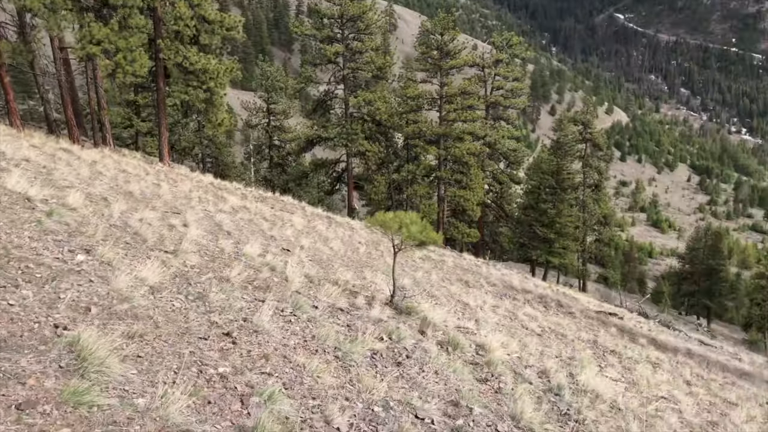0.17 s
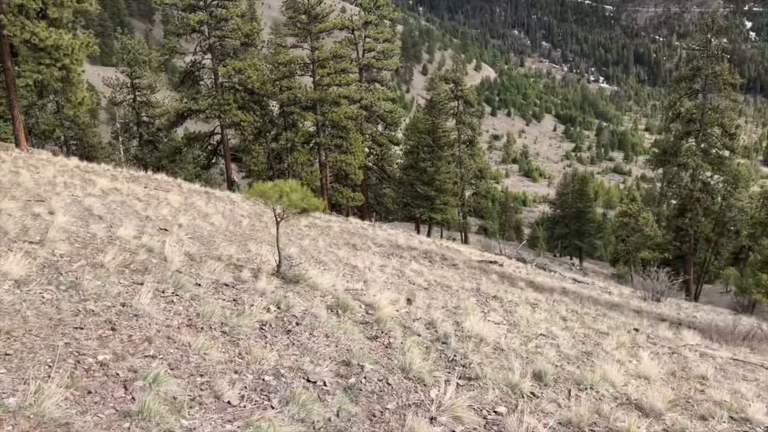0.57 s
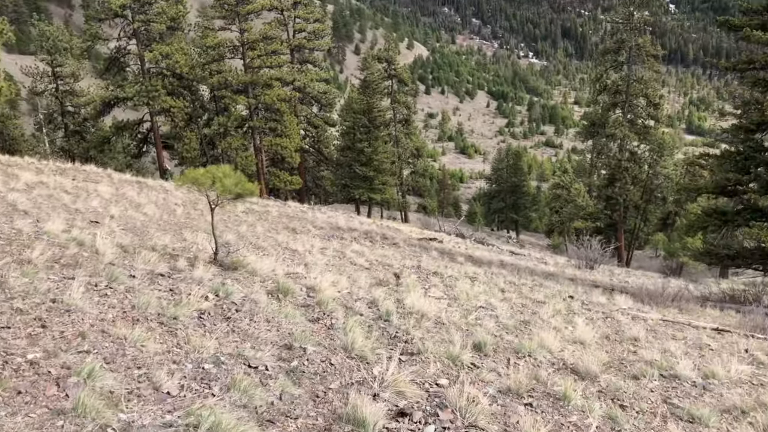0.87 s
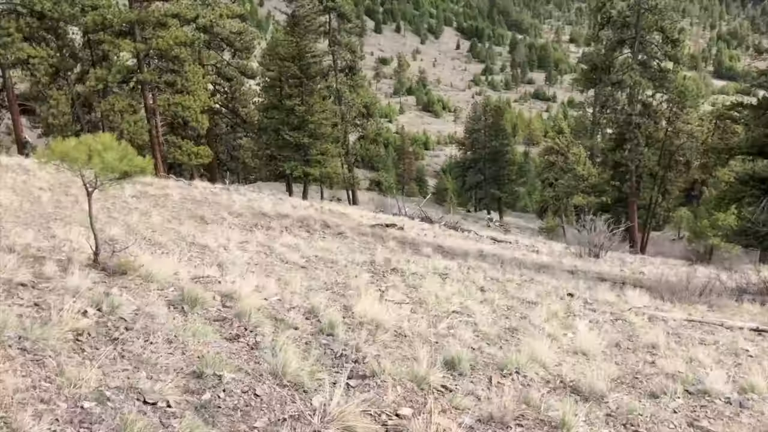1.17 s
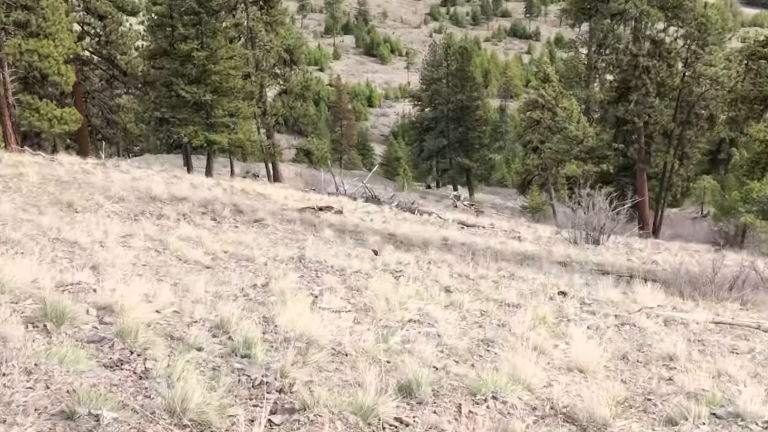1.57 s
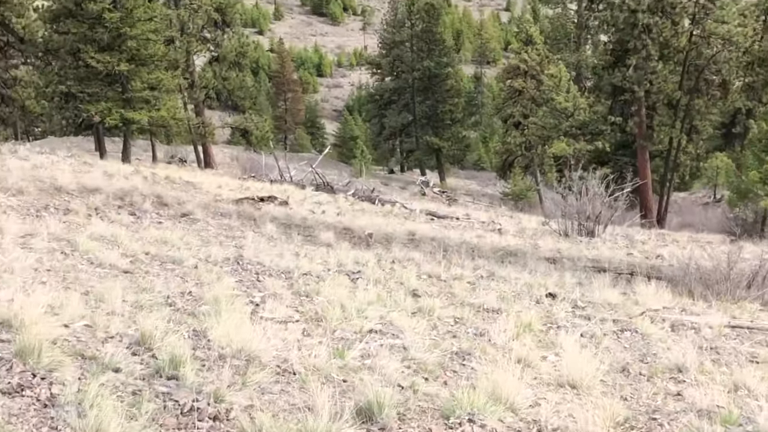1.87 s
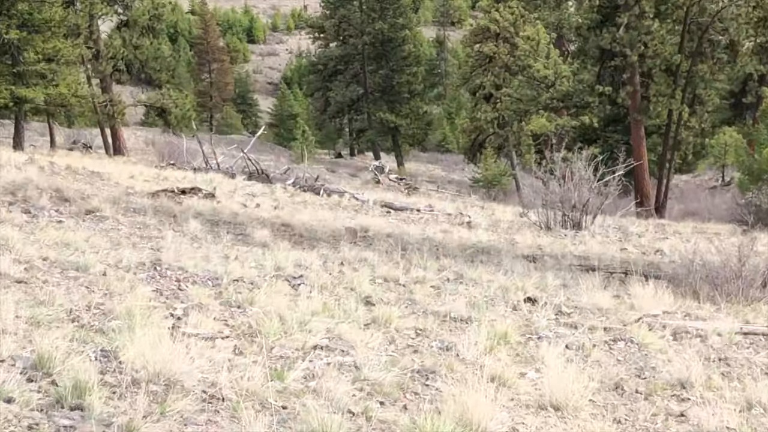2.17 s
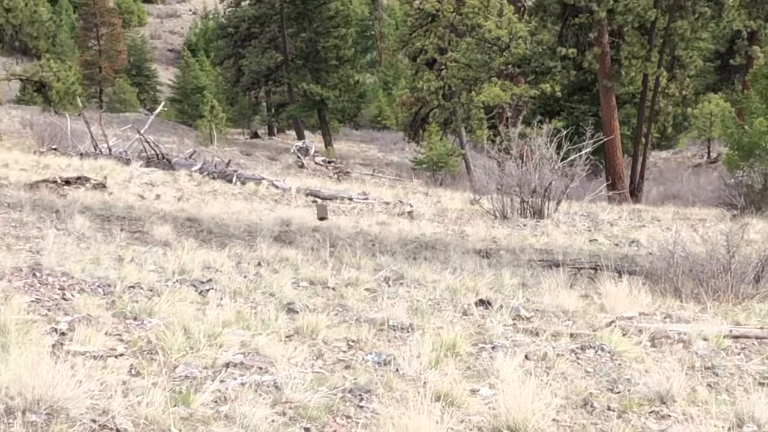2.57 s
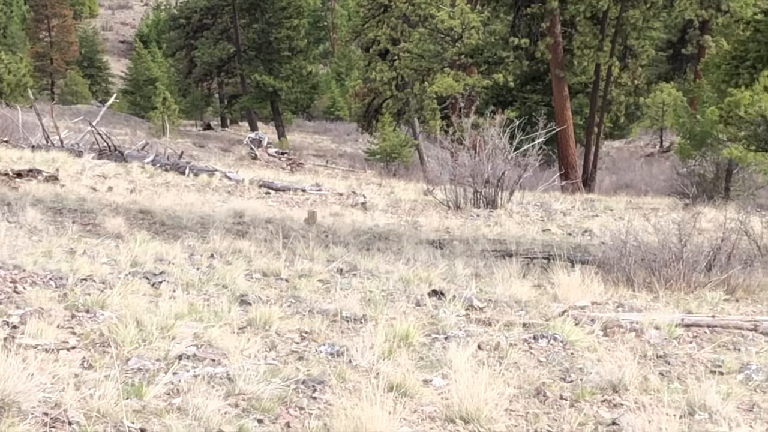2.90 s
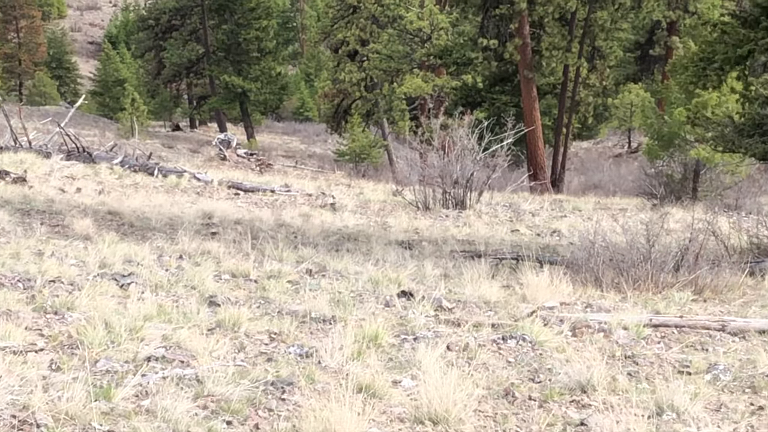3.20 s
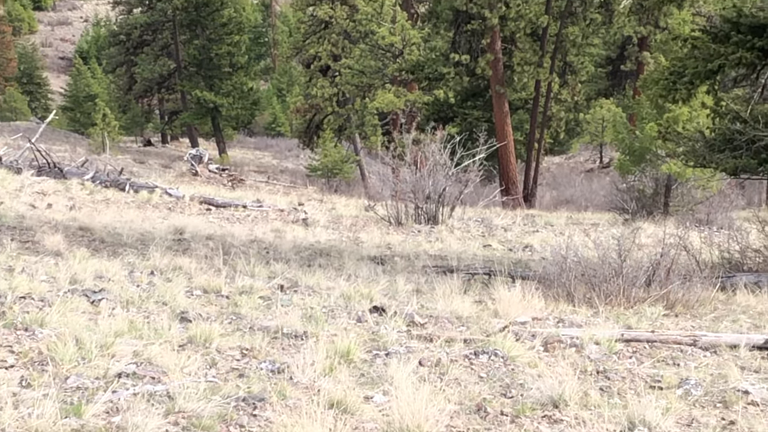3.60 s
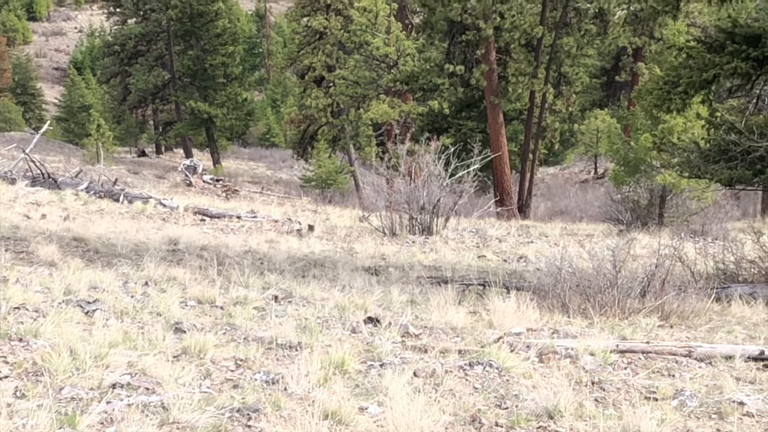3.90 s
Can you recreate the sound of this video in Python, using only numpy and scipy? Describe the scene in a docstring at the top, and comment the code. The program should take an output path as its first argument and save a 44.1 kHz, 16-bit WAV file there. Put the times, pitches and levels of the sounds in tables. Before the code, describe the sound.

An open, dry, stony hillside without echo. At about 0.1 seconds a rock lands with a gritty crunch, a dull soil thud and bright chips cracking; more short hits follow near 0.4 and 0.8 seconds, with scattered ticks and a trickle of sand, pebbles and dry-grass hiss between. Wind is faint at first, with soft low puffs. Around 1.2 seconds a hard buffet knocks the microphone, and at 1.4 a sharp cluster of gravel crunches and a small slide spill out. From about 1.85 seconds strong wind takes over: rapid, irregular, hollow low thuds and knocks, some slightly overloaded, over fluttering rumble with momentary lulls. The debris grows sparser, duller and more distant, just faint clicks by 3 seconds. The buffeting stays heavy, surging again from 3.5 seconds to a final thump at 4 seconds, where it cuts off.

```python
"""A rock bounds away down a dry, stony hillside: each landing is a burst of fine gravel grains over
a dull soil thud, with chips and pebbles as resonant ticks and a trickle of grains and hiss, fading as it goes.
Wind rises and hits the microphone in puffs with brief lulls: streams of low pressure pulses,
and single harder ones, make irregular dull knocks and thuds that grow louder."""
import sys
import numpy as np
from scipy import signal
from scipy.fft import rfft, irfft
from scipy.io import wavfile
from scipy.ndimage import uniform_filter1d

SR = 44100
rng = np.random.default_rng(int(sys.argv[2]) if len(sys.argv) > 2 else 0)


def dump_mix(stems):
    """Bounce the given channels to the path in sys.argv[1] as a 16-bit WAV at rate SR."""
    frames = np.atleast_2d(stems).T  # one column per channel
    limited = np.clip(frames, -1, 1)  # hard clip at full scale
    pcm = np.round(limited * 32767).astype(np.int16)
    wavfile.write(sys.argv[1], SR, pcm)


N = 178472
TIME = np.arange(N) / SR
TOP_HZ = 16000  # upper limit of the grains' pitch and of the microphone

# separate puffs of wind: t/s, level before the eddy trims/dB, half length/s,
# small eddies relative to the large/dB
WIND_PUFFS = [(0.075, -36.5, 0.02, -34), (0.567, -28, 0.025, -26), (0.78, -40.5, .025, -22),
              (0.889, -23.5, 0.012, -10.5), (0.959, -25.5, 0.024, -9.5), (1.194, -16, 0.017, -21),
              (1.263, -21.5, 0.023, -7), (1.329, -23, 0.019, -17), (1.471, -22.5, 0.017, -18),
              (1.571, -17.5, 0.017, -9), (1.671, -20, 0.021, -8), (1.809, -18, 0.0098, -11),
              (1.856, -16, 0.0078, -5), (1.887, -16, 0.013, -4), (1.985, -17, 0.028, -5.5),
              (2.029, -19.5, 0.012, -1), (2.102, -24, 0.042, 3), (2.182, -16.5, 0.0072, -3.5),
              (2.264, -26, 0.044, 2.5), (2.371, -23.5, 0.034, -2.5), (2.457, -21, .029, 4.5),
              (2.579, -22, 0.025, 3), (2.615, -19.5, 0.011, -3), (2.701, -26, 0.0091, 2.5),
              (2.809, -15, 0.022, -8), (2.954, -20, 0.082, -5), (3.072, -23.5, 0.011, -1.5),
              (3.206, -28, 0.072, -0.5), (3.285, -18, 0.046, -12.5), (3.38, -18, 0.011, -26),
              (3.496, -15.5, 0.035, -12.5), (3.595, -13.5, 0.014, -0.5), (3.7, -19.5, .015, -2.5),
              (3.768, -15, 0.035, -6), (3.914, -17, 0.044, -5.5), (4.028, -11.5, 0.018, -19.5)]
# single hard buffets of wind: t/s, peak at the microphone/dB, f/Hz
HARD_BUFFETS = [(0.973, -17, 256), (1.189, -4, 338), (1.193, -9, 172), (1.211, -12.5, 293),
                (1.279, -12.5, 287), (1.324, -18, 294), (1.569, -14, 366), (1.719, -14.5, 360),
                (1.850, -10, 530), (1.855, -4.5, 454), (1.861, -9.5, 590), (1.881, -2, 600),
                (1.885, -10, 258), (1.969, -9, 420), (2.036, -6, 257), (2.074, -4.5, 375), (2.086, -9, 380),
                (2.132, -7, 394), (2.175, -10, 290), (2.238, -5.5, 376), (2.355, -10, 283),
                (2.429, -14, 410), (2.450, -27, 414), (2.549, -10.5, 430), (2.856, -8.5, 420),
                (2.934, -8.5, 293), (2.978, -8.5, 402), (3.083, -11.5, 408), (3.086, -6.5, 357),
                (3.273, -10.5, 280), (3.547, -9.5, 330), (3.576, -17.5, 454), (3.588, -15.5, 363),
                (3.599, -6, 405), (3.61, -6, 248), (3.649, -10, 340), (3.692, -9.5, 376), (3.752, -9, 380),
                (3.762, -11.5, 350), (3.791, -8.5, 363), (3.844, -11.5, 360), (3.857, -9, 423),
                (3.994, -14, 441), (4.029, -9.5, 221)]
# the rock's landings: t/s, crunch level/dB, rise/s, decay/s, dull thud relative to the crunch/dB
ROCK_LANDINGS = [(0.137, -30.5, 0.022, 0.014, 0), (0.436, -24.5, 0.0005, 0.0098, 1.5),
                 (0.665, -45, .001, 0.01, -4), (0.788, -28.5, 0.0004, 0.0065, -3),
                 (0.952, -32, 0.033, 0.014, -13), (1.39, -27, 0.00082, 0.039, -48),
                 (1.406, -23, 0.00082, 0.0022, -9), (1.418, -22.5, 0.0016, 0.0073, -22),
                 (2.466, -48.5, 0.013, 0.047, 13), (3.045, -55, 0.026, 0.019, -17),
                 (3.41, -47.5, 0.035, 0.05, -8)]


def undb(db):
    """Decibels to gain."""
    return 10 ** (np.asarray(db) / 20)


def decibels(power):
    """Power to decibels."""
    return 10 * np.log10(power)


def curves(table):
    """Each column of a table, joined by straight lines in time."""
    times, *columns = np.transpose(table)
    return [np.interp(TIME, times, column) for column in columns]


def bells(times, half_s):
    """Bell-shaped swells of height 1 around the given times, one a row."""
    distance = TIME - np.reshape(times, (-1, 1))
    return np.exp(-(distance / np.reshape(half_s, (-1, 1))) ** 2)


def push(start, rise_s, decay_s):
    """An envelope that climbs in a straight line to 1, then dies away exponentially."""
    age = TIME - start
    return np.clip(age / rise_s, 0, 1) * np.exp(-np.maximum(age - rise_s, 0) / decay_s)


def steady(x, span_s):
    """Hold the rms near 1 over a moving span."""
    size = max(int(span_s * SR), 3)
    power = uniform_filter1d(uniform_filter1d(x ** 2, size), size)
    return x / np.sqrt(power + 1e-12)


def colour(x, points):
    """Filter by a spectrum of (f/Hz, relative level/dB), causally, so that clicks keep their sharp front."""
    hz, db = np.transpose(points)
    f = np.maximum(np.fft.rfftfreq(1024, 1 / SR), 1)
    log_gain = np.log(undb(np.interp(np.log(f), np.log(hz), db)))
    # fold the cepstrum onto positive time for minimum phase
    cepstrum = irfft(log_gain)
    cepstrum[1:512] *= 2
    cepstrum[513:] = 0
    response = irfft(np.exp(rfft(cepstrum)))
    return signal.fftconvolve(x, response / np.linalg.norm(response))[:N]


def place(times, shapes):
    """Sum short sounds (one a row) at their start times."""
    starts = (np.asarray(times) * SR).astype(int)
    index = starts[:, None] + np.arange(shapes.shape[1])
    inside = (index >= 0) & (index < N)
    return np.bincount(index[inside], shapes[inside], N)


def eddies(hz, turn, sweep=0.97, steep=1.062, lean=2.52, size=2048):
    """Pressure pulses of peak 1, centred in their rows; each slides down in pitch as its eddy passes."""
    f = np.maximum(np.fft.rfftfreq(size, 1 / SR), 1) / hz[:, None]
    strength = (f * np.exp(-f ** steep / steep)) ** lean  # smooth pulses have next to no treble
    phase = 2 * np.pi * (turn[:, None] - sweep * np.log(f))
    centred = np.fft.fftshift(irfft(strength * np.exp(1j * phase)), axes=1)
    pulses = centred * signal.windows.tukey(size)
    return pulses / np.abs(pulses).max(axis=1, keepdims=True)


def turbulence(db, hz, octaves_per_db, spread, scatter_db, span_s, count, size):
    """A stream of eddies of mixed size and strength; they pass faster, so sound higher, as the gust grows."""
    when, turn, pitch, strength = rng.uniform(-1.024, 1, (count, 4)).T
    times = (np.arange(count) + 2 * when) / count * N / SR
    below_peak_db = np.maximum(db - db.max(), -17)
    speed = 2 ** (octaves_per_db * np.interp(times, TIME, below_peak_db))
    pulses = eddies(hz * speed * np.exp(spread * pitch), turn, size=size)
    pulses *= undb(scatter_db * strength)[:, None]
    return undb(db) * steady(place(times - size / 2 / SR, pulses), span_s)


def puff_power(offset_db=0, stretch=1):
    """Summed power of the puffs; each swells and dies away evenly."""
    times, db, half_s, _ = np.transpose(WIND_PUFFS)
    return undb(db + offset_db) ** 2 @ bells(times, stretch * half_s)


def wind(large_db=-1, small_db=-1, puff_rumble_db=-12, rumble_stretch=2.5, calm_db=5, calm_s=0.0012):
    """Three sizes of eddy roll over the microphone; wind and puffs feed all, small ones most in hard wind."""
    # two long gusts: t/s, level of the eddies before trims/dB, level of the deep rumble/dB
    gusts = [(.08, -53, -42.5), (.26, -49.5, -55), (.54, -47.5, -36), (.72, -52.5, -42), (.9, -50, -35),
             (1.12, -39, -33.5), (1.5, -30.5, -29.5), (1.93, -22.5, -27.5), (2.08, -21.5, -19),
             (2.3, -21.5, -36), (2.52, -22.5, -32), (2.72, -25, -39), (3.12, -27, -29), (3.38, -25.5, -22),
             (3.66, -18, -36), (3.82, -16.5, -20), (3.96, -26, -16.5), (4.05, -18.5, -28)]
    # moments when the large and small eddies drop away for an instant: t/s
    lull_times = [1.612, 1.916, 1.942, 2.317, 2.41, 2.676, 2.756, 3.01, 3.115, 3.333, 3.629]
    lull_db, lull_half_s = -10.5, 0.014
    # stronger wind breaks into finer eddies: share at the reference level, growth in dB per dB of wind
    fine_share_db, fine_ref_db, fine_growth = -8, -27.5, 0.39
    blow, deep = curves(gusts)
    fine = blow + fine_share_db + fine_growth * (blow - fine_ref_db)
    rumble = decibels(undb(deep) ** 2 + puff_power(puff_rumble_db, rumble_stretch))
    large = decibels(undb(blow) ** 2 + puff_power())
    small = decibels(undb(fine) ** 2 + puff_power(np.array(WIND_PUFFS)[:, 3]))
    # each hard buffet sweeps the lesser eddies aside for a moment
    calm = bells(np.array(HARD_BUFFETS)[:, 0], calm_s).max(axis=0)
    lull = bells(lull_times, lull_half_s).max(axis=0)
    churn = turbulence(large + large_db, 197.0, 0.023, 0.27, 5.1, 0.033, count=600, size=4096)
    churn += turbulence(small + small_db, 424.5, 0.023, 0.3, 5.5, 0.042, count=1100, size=2048)
    swell = turbulence(rumble, 68.7, 0.0058, 0.15, 4.4, 0.085, count=200, size=8192)
    return swell + undb(lull_db * lull - calm_db * calm) * churn


def buffets(size=2048):
    """The fastest eddies strike the microphone as single knocks."""
    times, db, hz = np.transpose(HARD_BUFFETS)
    knocks = eddies(hz, rng.random(len(times)), size=size) * undb(db)[:, None]
    return place(times - size / 2 / SR, knocks)


def gravel(scatter_db, ring_s, count, size=96):
    """Tiny grains, each with its own pitch: many faint, a few loud; rms 1 on average."""
    when, pitch, luck, turn = rng.random((count, 4)).T
    t = np.arange(size) / SR
    tones = np.sin(2 * np.pi * (TOP_HZ * pitch[:, None] * t + turn[:, None]))
    grains = tones * np.exp(-t / ring_s)
    strength = undb(-scatter_db * np.log(np.maximum(luck, .004)))
    x = place(when * N / SR, grains * strength[:, None])
    return x / np.std(x)


def dust(near_db=-56, fade_db_per_s=6.0):
    """The finest grit sizzles at the top of the range and is soon lost with distance."""
    grit = gravel(2.5, .0003, count=14000)
    sizzle = colour(grit, [(2000, -21), (7000, 1.5), (13000, -0.5), (16000, -9.0)])
    return undb(near_db - fade_db_per_s * TIME) * sizzle


def flow():
    """How much gravel is moving: a fading rustle, and slides that gather quickly and run out slowly."""
    # rustle of grass and sand, fading as the rock gets further away: t/s, level before layer trims/dB
    rustle = [(0, -43), (.7, -51), (1.7, -49.5), (2.2, -56), (2.75, -57.5), (3.35, -63), (4.05, -63)]
    # little slides of gravel that the rock sets off: t/s, level before layer trims/dB
    slides = [(0, -52), (.26, -49), (.89, -42), (1.40, -40.5), (1.47, -38.5), (1.56, -52), (1.88, -48),
              (2.46, -50.5), (3.04, -52), (3.43, -56)]
    power = undb(curves(rustle)[0]) ** 2
    for start, db in slides:
        power = power + (undb(db) * push(start, rise_s=0.018, decay_s=0.067)) ** 2
    return np.sqrt(power)


def snaps(times, db, hz, width, ring_s=0.00023, rattle_s=0.0048, rattle_db=-19, size=768):
    """Each chip cracks in its own resonance, then rattles briefly as it settles."""
    t = np.arange(size) / SR
    envelope = np.exp(-t / ring_s) + undb(rattle_db) * np.exp(-t / rattle_s)
    cracks = rng.standard_normal((len(times), size)) * envelope
    f = np.maximum(np.fft.rfftfreq(size, 1 / SR), 1) / hz[:, None]
    resonance = 1 / (1 + 1j * (f - 1 / f) / width[:, None]) ** 2  # two equal stages
    rings = irfft(rfft(cracks) * resonance)
    return place(times, rings * (undb(db) / np.abs(rings).max(axis=1))[:, None])


def trickle(hiss_db=-4, sand_db=-3, pebble_db=3.5, range_db=12, pebble_hz=4600, spread=0.49, count=620):
    """Sand and small pebbles tick down the slope over the hiss of dry grass."""
    # colour of the grass and sand: f/Hz, relative level/dB
    trickle_colour = [(200, -1.5), (600, 1), (1500, 5.5), (3200, 3), (6200, -2), (9500, -24.5),
                      (16000, -13)]
    grass = colour(rng.standard_normal(N), trickle_colour)
    sand = colour(gravel(4.85, 0.00044, count=5000), trickle_colour)
    when, mass, damping = rng.random((count, 3)).T
    hz = pebble_hz * np.exp(spread * rng.standard_normal(count))
    peak_db = pebble_db + range_db * mass ** 2
    width = .3 + .8 * damping  # share of the pitch: even the clearest pebble rings only dully
    pebbles = snaps(when * N / SR, peak_db, hz, width, ring_s=0.00074, rattle_db=-17)
    return flow() * (undb(hiss_db) * grass + undb(sand_db) * sand + pebbles)


def chips():
    """The loudest stone chips knocked loose and dry stalks snapping, each a resonant crack."""
    # t/s, peak level/dB, f/Hz, bandwidth of each resonance stage as a share of the pitch
    chip_table = [(0.042, -22, 3400, 1.5), (.059, -25, 5300, 1.3), (0.093, -23, 13000, 0.7),
                  (.144, -11, 2780, 1.3), (0.148, -8, 3600, .35), (0.147, -20, 7150, 0.054),
                  (0.141, -22, 12000, 0.93), (0.1539, -13.5, 1110, 1.37), (0.173, -17.5, 2400, 0.7),
                  (.252, -19, 5370, 2.6), (.275, -27, 4220, 0.7), (0.2795, -17.5, 2040, 1.2),
                  (0.423, -16.5, 3000, 1.8), (.434, -13.5, 1470, 0.5), (0.543, -19.5, 4100, 1.2),
                  (0.6432, -15, 2970, 1.3), (0.668, -13.5, 12000, 4.8), (0.673, -16, 6960, 1.1),
                  (.789, -17.5, 13500, 0.5), (.883, -20, 5600, 0.44), (.884, -25.5, 7940, 0.091),
                  (0.934, -22.5, 4000, 3), (1.003, -21.5, 5800, 0.54), (1.061, -21.5, 4260, 1.1),
                  (1.173, -24, 3770, 1.3), (1.267, -23, 6440, 0.19), (1.409, -11, 3280, 1.1),
                  (1.444, -16.5, 2980, 0.55), (1.452, -19.5, 5350, 0.21), (1.486, -23.5, 3880, 0.38),
                  (1.668, -25.5, 2160, 0.7), (1.796, -26, 1570, 0.58), (1.875, -18.5, 3160, 2.2),
                  (1.903, -18.5, 1880, 0.6), (2.018, -25, 2500, 0.48), (2.140, -30, 3520, 0.43),
                  (2.296, -32.5, 3400, 0.64), (2.442, -20.5, 5950, 0.41), (2.498, -18.5, 2960, 0.67),
                  (2.501, -26, 9000, 1.3), (2.553, -27, 5500, 1.2), (2.638, -22, 11400, 0.52),
                  (2.652, -23, 2050, 0.99), (2.715, -27, 3140, 0.65), (2.796, -19.5, 2100, 0.75),
                  (2.854, -27.5, 1920, 0.76), (2.973, -31, 4820, 0.5), (3.037, -31, 12000, 1.7),
                  (3.074, -31, 6500, 2.9), (3.233, -34, 2900, 0.64), (3.455, -30.5, 6900, 0.33),
                  (3.868, -36, 3850, 0.73)]
    return snaps(*np.transpose(chip_table))


def booms():
    """The ground gives under each landing and swings a few times."""
    soil_hz, soil_decay_s, soil_db = 176, 0.011, -15  # level relative to the thud
    times, db, _, _, thud_db = np.transpose(ROCK_LANDINGS)
    age = np.maximum(TIME - times[:, None], 0)
    swings = np.sin(2 * np.pi * soil_hz * age) * np.exp(-age / soil_decay_s)
    return undb(db + thud_db + soil_db) @ swings


def far(x, edge_hz=7700, loss_db_per_s=6.5):
    """Air and grass soak up the treble more and more with time, as the source moves off."""
    low = signal.sosfiltfilt(signal.butter(2, edge_hz, fs=SR, output="sos"), x)
    return low + undb(-loss_db_per_s * TIME) * (x - low)


def landings():
    """Each landing crushes a patch of gravel and thumps the soil under it."""
    # colour of crushed gravel: f/Hz, relative level/dB
    crunch_colour = [(200, -40.5), (600, -17), (1500, -4.5), (3200, -3), (6000, -5), (8000, -6.5),
                     (10000, -11.5), (16000, -8.5)]
    soil_colour = [(60, -3), (250, 16.5), (1100, 14.0), (2500, -51), (8000, -57)]
    crush, thump = np.zeros(N), np.zeros(N)
    for start, db, rise_s, decay_s, thud_db in ROCK_LANDINGS:
        force = undb(db) * push(start, rise_s, decay_s)
        crush += force
        thump += force * undb(thud_db)
    crunch = steady(colour(gravel(3.9, 0.00005, count=24000), crunch_colour), 0.011)
    soil = steady(colour(gravel(3.2, 0.00015, count=24000), soil_colour), 0.0043)
    return crush * far(crunch) + thump * soil


def scene():
    """Open hillside with no echo: the rock, its debris and the wind."""
    rock = landings() + booms()
    debris = chips() + trickle() + dust()
    return (rock + debris + wind() + buffets())[None]


def record(dry, low_hz=46, ceiling=1.05, fade_s=.006):
    """The microphone sheds the deepest rumble, rings a little and rounds the hardest knocks; the top is cut."""
    # resonances of the microphone and its housing: f/Hz, Q, level of the added ring/dB
    housing = [(176, 7.2, -11), (488, 5.6, -8)]
    thinned = signal.sosfilt(signal.butter(4, low_hz, "high", fs=SR, output="sos"), dry)
    ring = sum(undb(db) * signal.lfilter(*signal.iirpeak(hz, q, fs=SR), thinned) for hz, q, db in housing)
    swing = (thinned + ring) / ceiling
    rounded = ceiling * swing / (1 + swing ** 4) ** (1 / 4)
    fade = np.clip((TIME[-1] - TIME) / fade_s, 0, 1) ** 2  # at the very end
    top_cut = signal.ellip(8, .2, 70, TOP_HZ, fs=SR, output="sos")
    return signal.sosfilt(top_cut, rounded * fade)


dry = scene()
out = record(dry)
dump_mix(out)
```